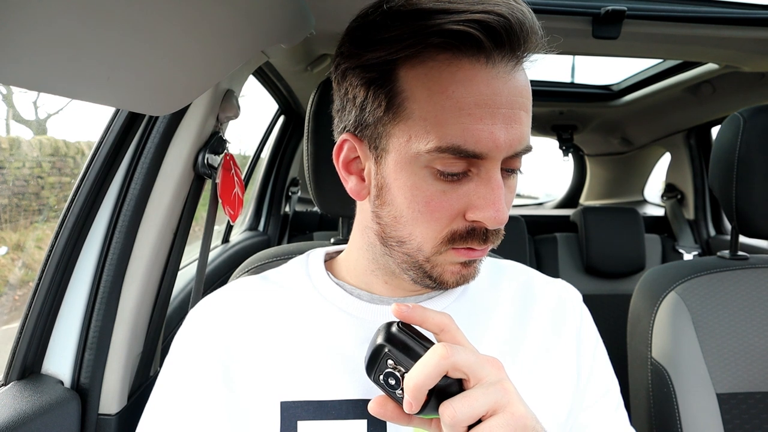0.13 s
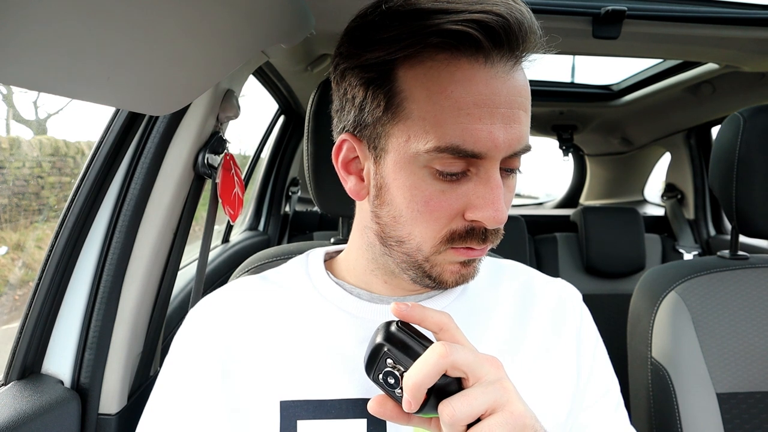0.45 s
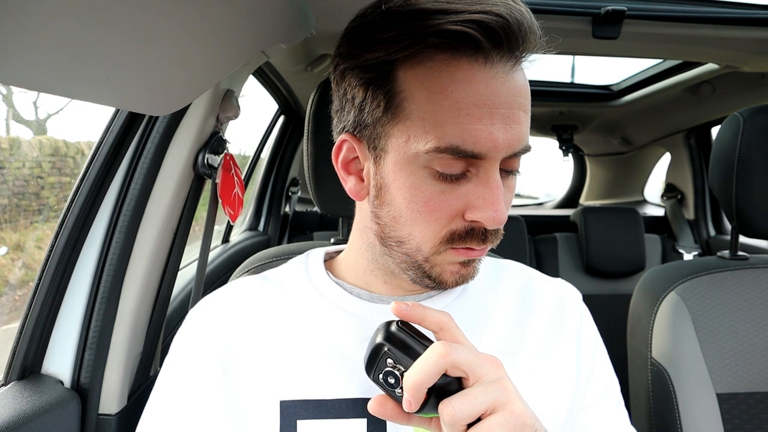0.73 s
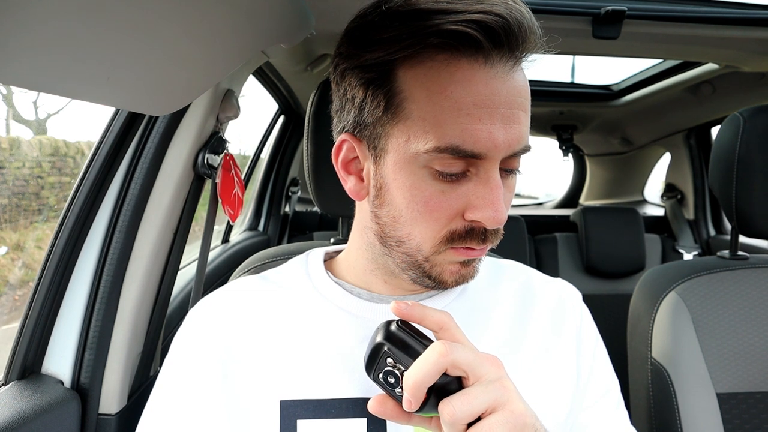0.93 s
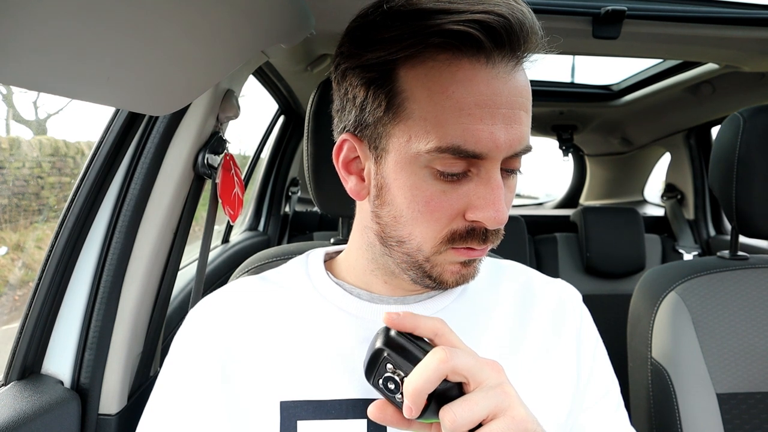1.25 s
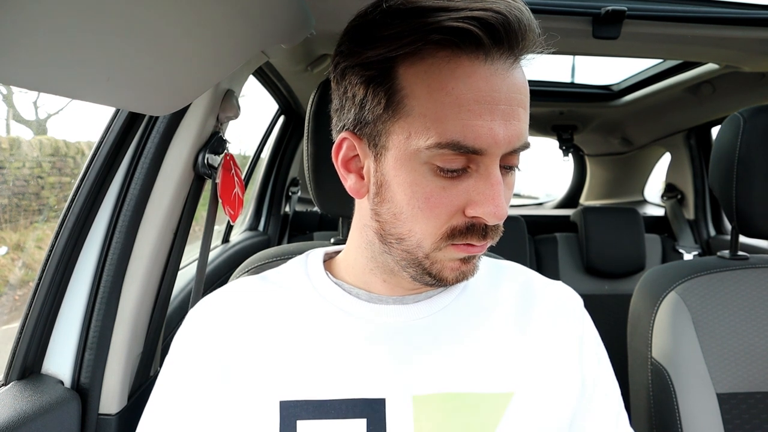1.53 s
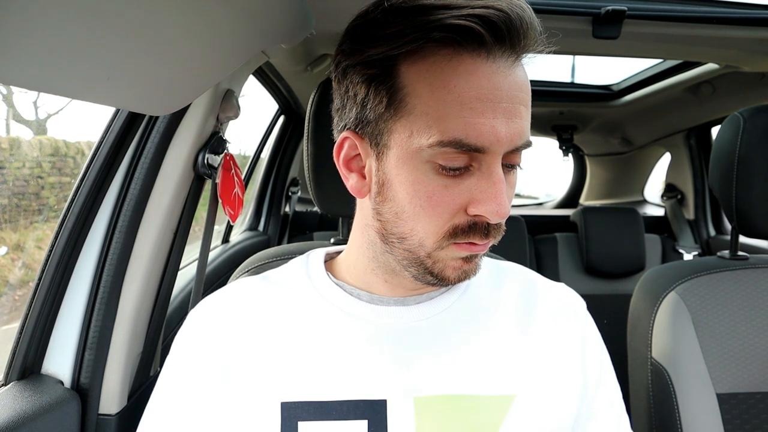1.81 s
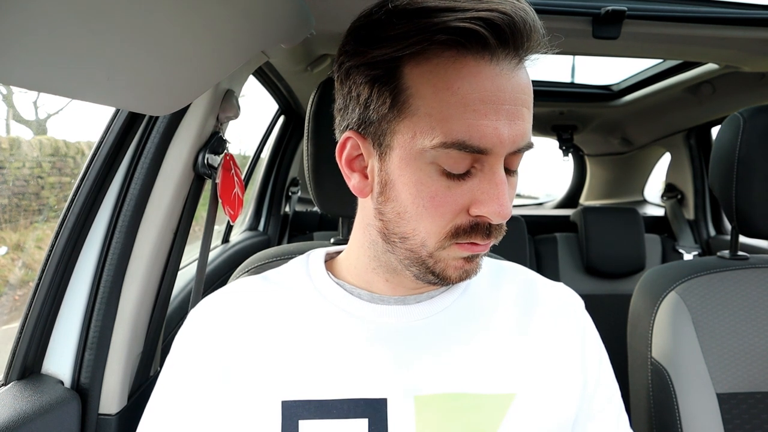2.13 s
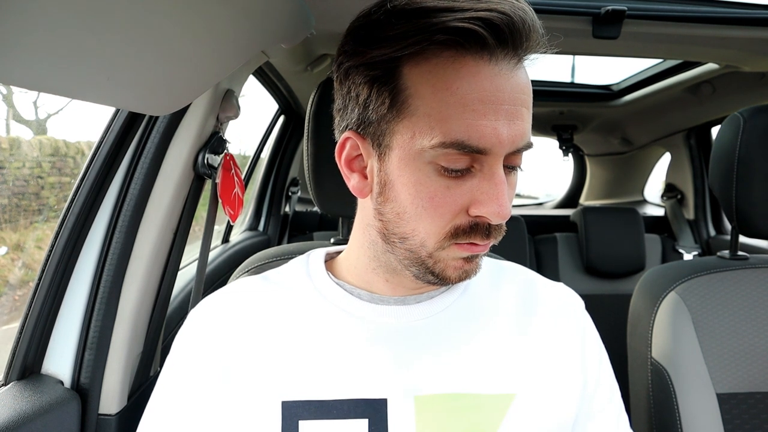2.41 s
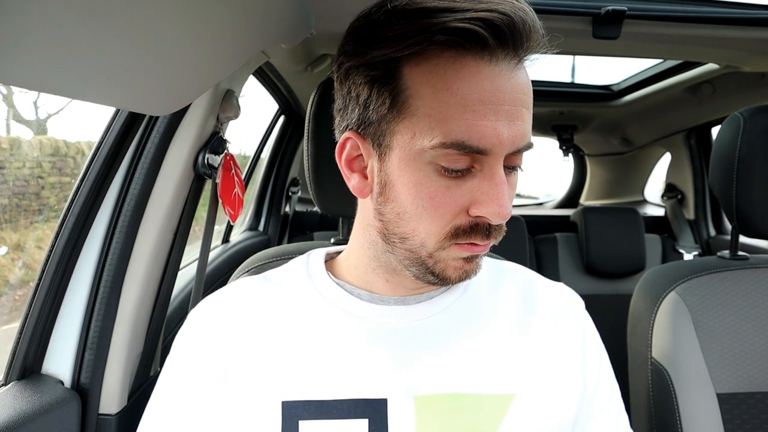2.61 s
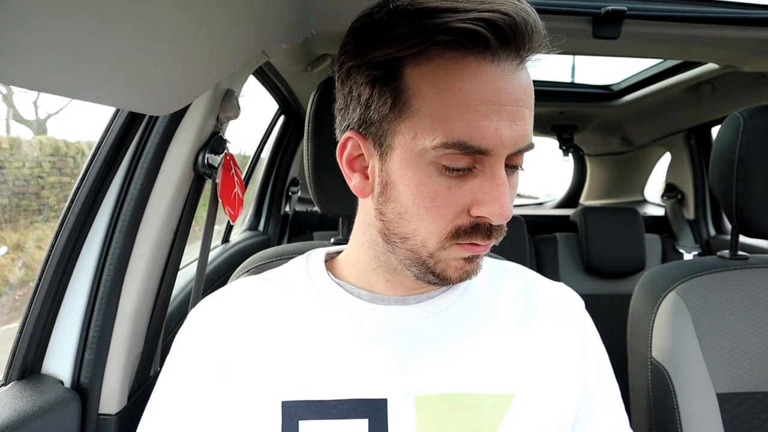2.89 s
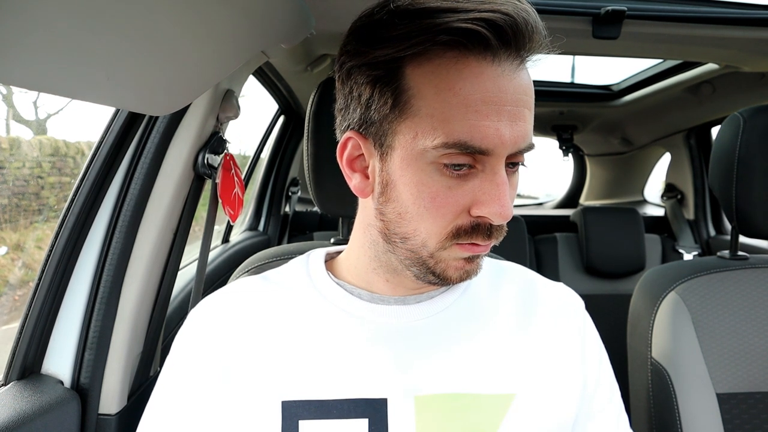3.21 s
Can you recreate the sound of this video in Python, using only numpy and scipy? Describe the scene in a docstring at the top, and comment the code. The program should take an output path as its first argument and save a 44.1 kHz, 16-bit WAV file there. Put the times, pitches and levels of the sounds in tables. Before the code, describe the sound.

A car engine idles with a steady low booming drone, heard inside the closed cabin.

```python
"""A four-cylinder engine idles inside a closed cabin: firing orders, as cosines, boom steadily in the bass.
Pulses of unequal size roughen them; shaped noise from engine bay and blower hisses wide in the treble,
a panel hums, a belt-driven unit whines as faint unsteady sines, and a valve ticks as a short ring.
Halfway through, cloth rubs a few times as swells of fine hiss, and plastic clicks as decaying modes."""
import sys
import numpy as np
from scipy import signal
from scipy.fft import rfft, irfft, next_fast_len
from scipy.io import wavfile
from scipy.ndimage import map_coordinates

SR = 44100
rng = np.random.default_rng(int(sys.argv[2]) if len(sys.argv) > 2 else 0)


def bounce(signal):
    """Save signal as a 16-bit WAV file at the path given by the first command-line argument."""
    frames = np.transpose(np.atleast_2d(signal))
    limited = np.clip(frames, -1, 1)
    pcm = np.round(limited * 32767).astype(np.int16)
    wavfile.write(sys.argv[1], SR, pcm)


def gain_from_db(level_db):
    """Turn a decibel level (scalar or array-like) into a linear amplitude factor."""
    decades = np.asarray(level_db, float) / 20
    return 10 ** decades


N = 147735

FIRING_HZ = 26.665


def unit(x):
    """Scale to rms 1."""
    return x / np.sqrt(np.mean(x ** 2) + 1e-20)


def along(points, hz):
    """Interpolate (Hz, value) points on a log frequency axis."""
    point_hz, value = np.transpose(points)
    return np.interp(np.log(hz + 1), np.log(point_hz + 1), value)


def wobble(rate_hz):
    """Smooth random curve with rate_hz knots a second."""
    knots = rng.standard_normal(int(N * rate_hz / SR) + 4)
    return map_coordinates(knots, [np.arange(N) * rate_hz / SR])


def filtered(x, response):
    """Multiply the spectrum of x by a response of frequency."""
    size = next_fast_len(N + SR // 2)
    hz = np.fft.rfftfreq(size, 1 / SR)
    return irfft(rfft(x, size) * response(hz), size)[..., :N]


def coloured(x, points):
    """Shape x by a (Hz, dB) spectrum, then scale to rms 1."""
    return unit(filtered(x, lambda hz: gain_from_db(along(points, hz))))


def ears(mid, side):
    """Left and right from shared and differing parts."""
    return np.array([mid + side, mid - side])


def crank():
    """Firing angle in radians, a whole turn per firing, with a slight drift in speed."""
    first_s, wander_rad, wander_hz = .021, .05, 1.5
    steady = 2 * np.pi * FIRING_HZ * (np.arange(N) / SR - first_s)
    return steady + wander_rad * wobble(wander_hz)


def boom(angle):
    """Orders of the firing rate, phase-shifted by cabin modes and unequal at the two ears."""
    # firing orders: order (multiple of firing rate), relative_db
    orders = [(1, -25), (2, 0), (3, -10), (4, -20), (5, -9), (6, -18), (7, -20), (8, -23), (9, -33),
              (10, -36), (11, -29), (12, -29), (13, -35), (14, -38), (15, -32), (16, -36), (20, -45),
              (21, -38), (1.5, -28), (3.5, -33)]
    # left-right difference relative to each order: pitch_hz, side_db
    side_spectrum = [(50, -53.5), (130, -42.5), (190, -20), (260, -15), (400, -10), (600, -4)]
    # air resonances (delay, positive) and antiresonances (advance, negative): centre_hz, width_hz, half_turns
    cabin_modes = [(120, 12, -.33), (166, 22, 1.03), (228, 10, -.7)]
    level_db = -19.5
    diffuse_hz = 250  # above it the many cabin modes scatter the phases
    mount_hz, mount_lead_rad = 35, 2.3  # below it the engine rocks on its mounts ahead of the airborne boom
    mid, side = np.zeros(N), np.zeros(N)
    for order, relative_db in orders:
        hz = order * FIRING_HZ
        mid_chance_rad, side_chance_rad = rng.uniform(0, 2 * np.pi, size=2)
        lag_rad = sum(half_turns * np.arctan2(hz * width_hz, centre_hz ** 2 - hz ** 2)
                      for centre_hz, width_hz, half_turns in cabin_modes)
        phase_rad = mount_lead_rad * (hz < mount_hz) - lag_rad - mid_chance_rad * (hz > diffuse_hz)
        gain = np.sqrt(2) * gain_from_db(level_db + relative_db)
        mid += gain * np.cos(order * angle + phase_rad)
        side += gain * gain_from_db(along(side_spectrum, hz)) * np.cos(order * angle + side_chance_rad)
    return ears(mid, side)


def uneven(angle):
    """One shaped pulse per firing, sized by cylinder and by chance; same in both ears."""
    # one relative size per cylinder, in firing order
    cylinder_sizes = [.5, -.3, .25, -.45]
    # pulse spectrum: pitch_hz, relative_db
    spectrum = [(100, -60), (255, -22), (278, 0), (308, -1), (330, -14), (400, -12), (500, -14), (750, -20),
                (1200, -140)]
    scatter, level_db = .15, -48.5
    at = np.flatnonzero(np.diff(np.floor(angle / (2 * np.pi))) > 0)
    offsets = np.subtract(cylinder_sizes, np.mean(cylinder_sizes))
    pulses = np.zeros(N)
    pulses[at] = np.resize(offsets, len(at)) + scatter * rng.standard_normal(len(at))
    return gain_from_db(level_db) * coloured(pulses, spectrum)


def bay(angle):
    """Engine bay and blower noise, its lower part swelling with the firings, and a resonant panel."""
    # noise shared by both ears: pitch_hz, relative_db
    mid_spectrum = [(12, -16), (25, -6.5), (50, -2.5), (95, -3.5), (120, -4), (150, -5), (190, -6.5),
                    (225, -8), (260, -15.5), (295, -7.5), (350, -13.5), (440, -15.5), (485, -11),
                    (590, -15.5), (680, -20), (770, -14.5), (820, -22.5), (900, -20), (960, -21),
                    (1100, -26), (1500, -31.5), (2950, -37.5), (3400, -40), (7600, -50), (10000, -59.5),
                    (12000, -61.5), (13500, -59), (15000, -62.5)]
    # noise differing between the ears: pitch_hz, relative_db
    side_spectrum = [(15, -42), (60, -15), (200, -5), (450, -6.5), (580, -6), (750, -1.5), (800, -5.5),
                     (930, -3.5), (1070, -8), (2000, -12), (2950, -13.5), (3400, -16.5), (6000, -24),
                     (10200, -33.5), (12500, -37.5), (15000, -45)]
    mid_db, side_db = -38, -48
    pulsing, pulse_top_hz = .15, 1200  # swelling share, fading above this pitch
    panel_hz, panel_width_hz, panel_db = 666, 120, -49
    panel_gains = np.array([[1], [-.1]])  # panel on the left; right ear faint and inverted

    def panel_response(hz):
        damping = hz * panel_width_hz
        return (damping / np.hypot(panel_hz ** 2 - hz * hz, damping)) ** 2

    noise = rng.standard_normal((3, N))
    low_noise = filtered(noise, lambda hz: 1 / (1 + (hz / pulse_top_hz) ** 2))
    noise += pulsing * np.cos(angle) * low_noise
    panel = unit(filtered(noise[2], panel_response))
    mid = gain_from_db(mid_db) * coloured(noise[0], mid_spectrum)
    side = gain_from_db(side_db) * coloured(noise[1], side_spectrum)
    return ears(mid, side) + gain_from_db(panel_db) * panel * panel_gains


def whine():
    """Faint sines of the belt-driven unit, slightly unsteady in pitch."""
    # tones: pitch_hz, mid_rms_db
    tones = [(487, -61.5), (670, -55.5), (765, -60.5), (861, -67.5), (2690, -76.5)]
    blur_hz, blur_rate_hz, side_db = 5, 8.6, -6
    t = np.arange(N) / SR

    def tone(hz, db):
        turns = hz * t + rng.random() + np.cumsum(blur_hz * wobble(blur_rate_hz)) / SR
        return np.sqrt(2) * gain_from_db(db) * np.sin(2 * np.pi * turns)

    mid = sum(tone(hz, db) for hz, db in tones)
    side = sum(tone(hz, db) for hz, db in tones)
    return ears(mid, gain_from_db(side_db) * side)


def ticks():
    """Valve tick: a short ring of random size once an engine cycle, four firing periods."""
    first_s, level_db, scatter_db, pitch_hz, t60_s = .148, -53, 3, 1700, .03
    at = (np.arange(first_s, N / SR, 4 / FIRING_HZ) * SR).astype(int)
    draw = rng.standard_normal((len(at), 2))
    blows = np.zeros((2, N))  # mid, side
    blows[:, at] = gain_from_db(level_db + scatter_db * draw.T)
    t = np.arange(SR // 10) / SR
    ring = np.sin(2 * np.pi * pitch_hz * t) * gain_from_db(-60 * t / t60_s)
    mid, side = signal.fftconvolve(blows, ring[None], axes=1)[:, :N]
    return ears(mid, side)


def cloth():
    """Cloth rubs: fine hiss in swells that rise and fall exponentially."""
    # rubs: peak_s, level_db
    rubs = [(1.654, -65.5), (1.778, -67.5), (1.83, -79), (1.89, -70.5), (1.971, -73), (2.03, -73),
            (2.068, -77.5), (2.51, -76), (2.67, -79)]
    # hiss spectrum: pitch_hz, relative_db
    spectrum = [(2000, -52.5), (6000, -8.5), (8500, -0.5), (11500, 1.5), (13500, -1.5), (16000, -35.5)]
    rise_s, fall_s, side_db = .011, .028, 1
    t = np.arange(N) / SR
    swell = sum(gain_from_db(db) * np.exp(-np.abs(t - peak_s) / np.where(t < peak_s, rise_s, fall_s))
                for peak_s, db in rubs)
    mid, side = swell * np.sqrt(2) * coloured(rng.standard_normal((2, N)), spectrum)
    return ears(mid, gain_from_db(side_db) * side)


def clicks():
    """Decaying modes of a plastic part, with the cabin's brief echo as decaying noise."""
    # clicks: start_s, level_db, pitch_factor, upper_tilt_db, left_over_right_db
    events = [(1.7257, -43.5, 1.21, -21, -3.5), (2.0145, -40.5, 1.013, -11, 9.5),
              (2.0184, -53.5, 1.02, 9, 7.5)]
    # plastic modes: pitch_hz, relative_db, t60_s
    modes = [(1560, 1.5, 0.016), (2020, -1, .011), (3613, -1, 0.014), (4160, -5.5, 0.021),
             (4476, -3.5, 0.016), (6170, -8, .009), (10430, -17, .005)]
    upper_hz, pitch_scatter, side_db = 3000, .016, 1.5
    echo_db, echo_t60_s = -3.5, .07
    t = np.arange(SR // 8) / SR

    def ring(pitch, tilt_db, phase_span_rad):
        total = np.zeros(len(t))
        for hz, db, t60_s in modes:
            decay = gain_from_db(db + tilt_db * (hz > upper_hz) - 60 * t / t60_s)
            mode_hz = hz * rng.normal(pitch, pitch_scatter)
            total += decay * np.sin(2 * np.pi * mode_hz * t + phase_span_rad * rng.random())
        return total

    direct = np.zeros((2, N + SR))
    for start_s, db, pitch, tilt_db, pan_db in events:
        mid = ring(pitch, tilt_db, 0)
        side = ring(pitch, tilt_db, 2 * np.pi)
        start = round(start_s * SR)
        pan = gain_from_db([[pan_db / 2], [-pan_db / 2]])
        direct[:, start:start + len(t)] += gain_from_db(db) * ears(mid, gain_from_db(side_db) * side) * pan
    tail = rng.standard_normal((2, len(t))) * gain_from_db(-60 * t / echo_t60_s)
    echo = signal.fftconvolve(direct, tail / np.linalg.norm(tail[0]), axes=1)
    return direct[:, :N] + gain_from_db(echo_db) * echo[:, :N]


def scene():
    """Sum all sources in the cabin."""
    angle = crank()
    return boom(angle) + uneven(angle) + bay(angle) + whine() + ticks() + cloth() + clicks()


def band_limit(x):
    """A steep low-pass at the top of the band."""
    return signal.sosfilt(signal.butter(12, 14960, fs=SR, output="sos"), x)


def record(dry):
    """Unequal microphones: opposite treble shelves leave the left a little duller."""
    left_treble_db, treble_hz = -1, 1500  # left relative to right
    half_db = left_treble_db / 2 * np.array([[1], [-1]])
    mix = filtered(dry, lambda hz: gain_from_db(half_db / (1 + (treble_hz / (hz + 1)) ** 2)))
    return band_limit(mix)


dry = scene()
out = record(dry)
bounce(out)
```